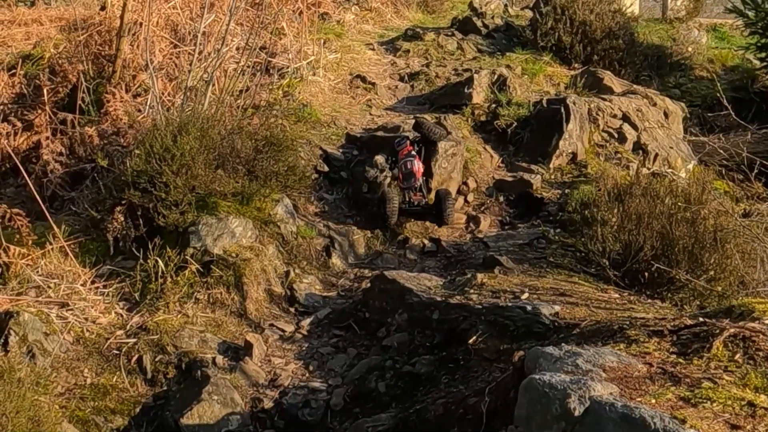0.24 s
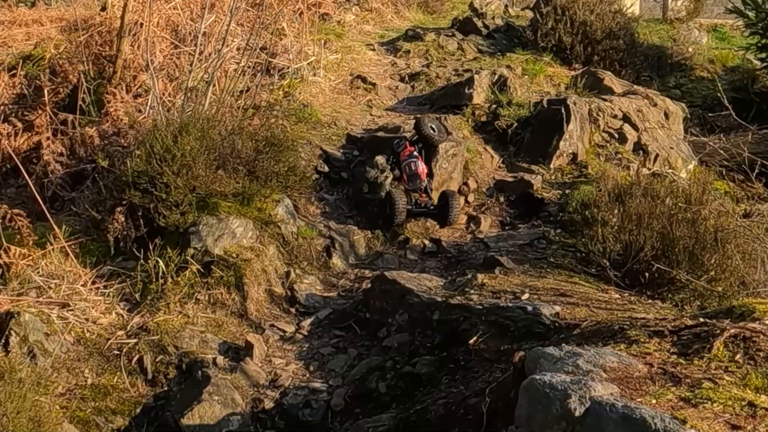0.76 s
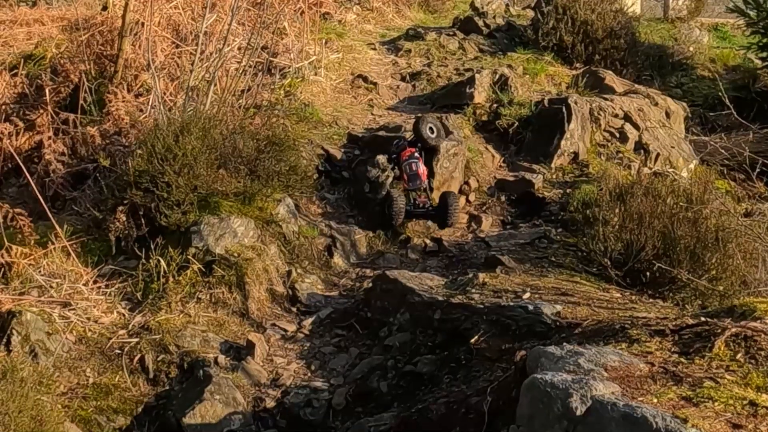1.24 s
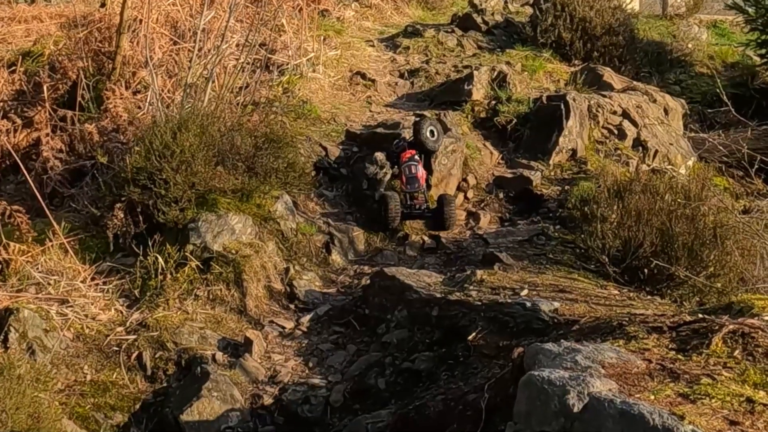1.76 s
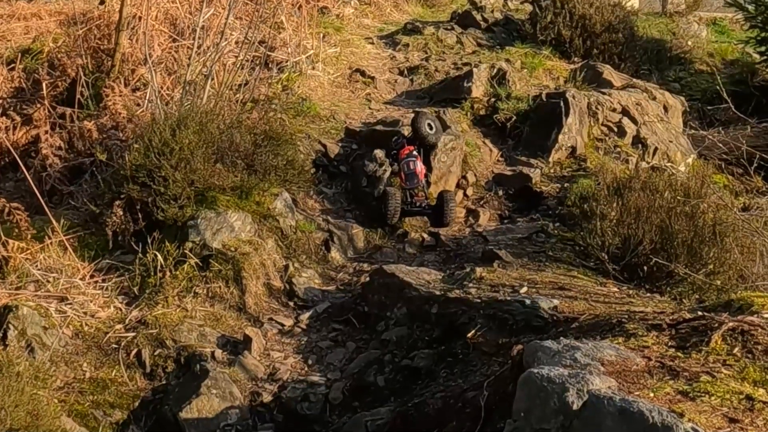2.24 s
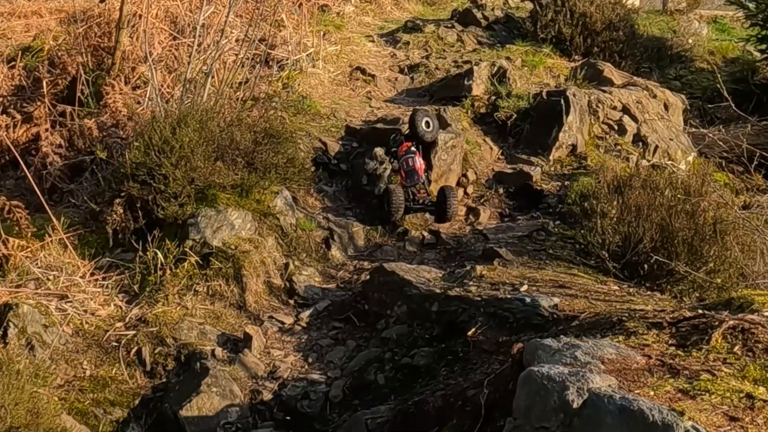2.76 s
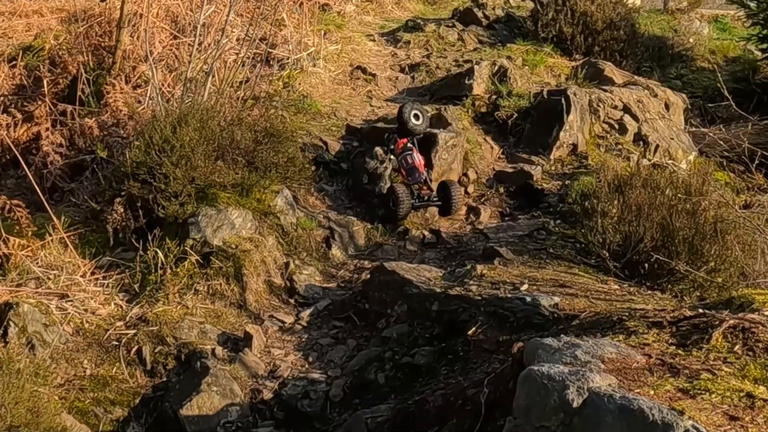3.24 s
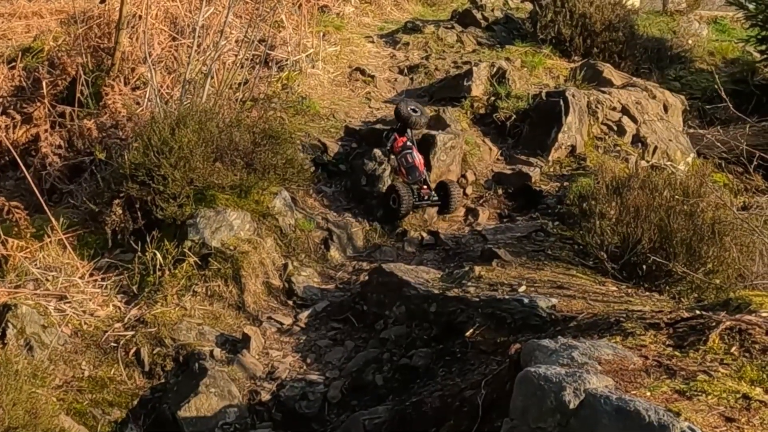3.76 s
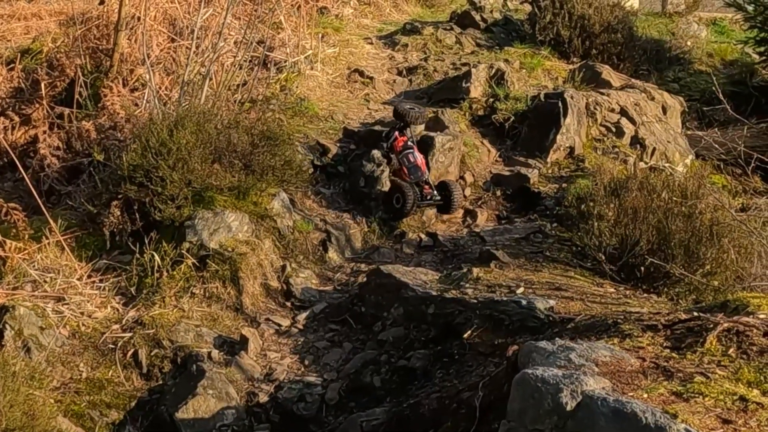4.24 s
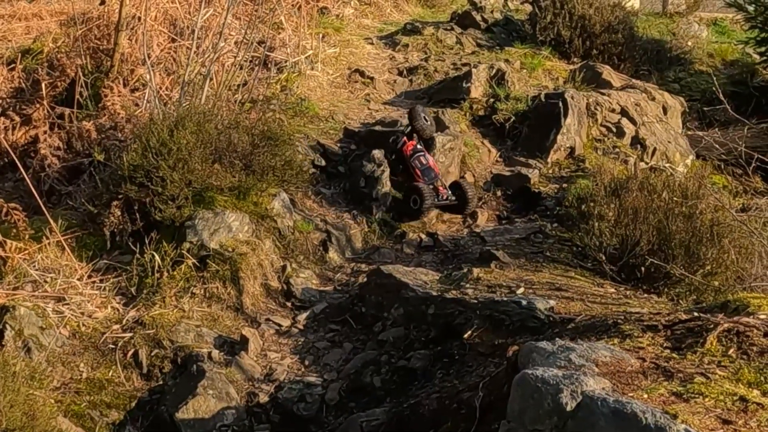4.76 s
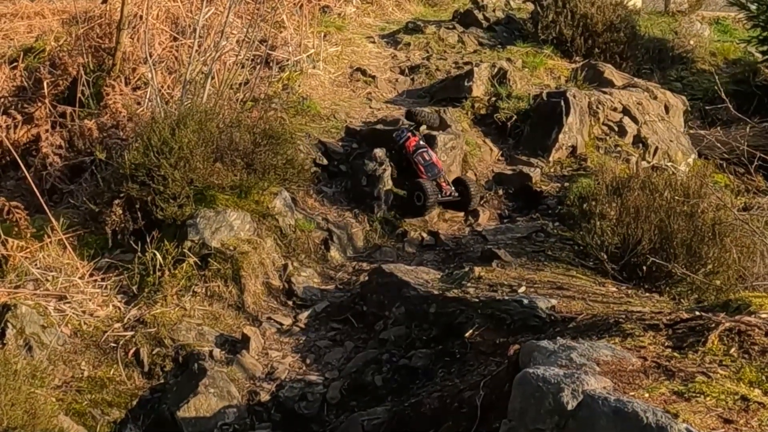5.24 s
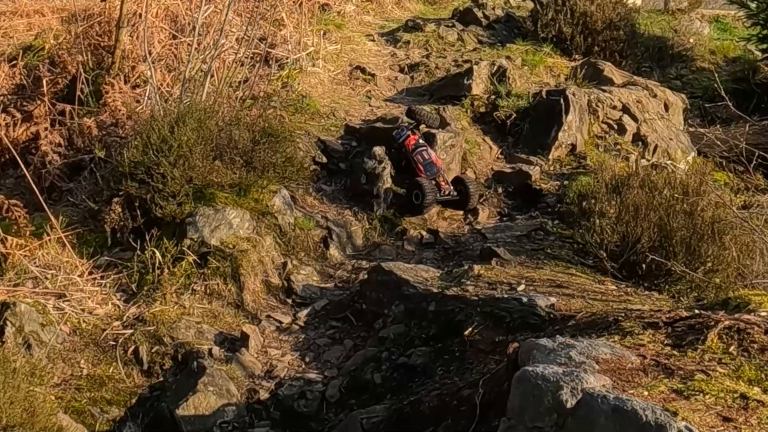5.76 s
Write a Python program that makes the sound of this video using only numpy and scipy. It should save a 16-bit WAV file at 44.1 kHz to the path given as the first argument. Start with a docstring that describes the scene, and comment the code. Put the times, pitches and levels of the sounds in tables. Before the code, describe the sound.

Quiet open hillside, with a soft steady rush and low wind bumps on a stereo microphone some metres from a small electric crawler. A gritty blip opens, a stone click comes at 0.16 s, a short motor whirr at 0.3, then bright servo zips from 0.55 to 0.9. Thin bird notes sound around 1 s. The motor whines and growls at 1.1-1.3, lower at 1.5-1.6, with more bird whistles to 1.85, then higher near 2.0. Servo zips overlap it and return at 2.3-2.5. The bird sings again from 2.5 to 3.1 while the motor grinds slowly, with knocks near 2.9-3.3. Two zips follow at 3.6-4.05, with wind thumps. A hard crack and knock lands at 4.26, another at 4.75. From 4.5 servo and drive work together; after 5.2 the growling whine swells, rises, sags around 5.7, and revs again at the end.

```python
"""A radio-controlled crawler's drive motor whines in short bursts over a growling gear train, with brief gritty rasps.
The crawler inches up a rocky gully, some metres from a camera outdoors; swept harmonics and tooth noise
ring through its casings. The steering servo zips; noise bursts and resonances make tyres and chassis knock on stone.
A small bird sings thinly in the trees as gliding sines, and light wind, shaped noise, buffets the microphone."""
import sys
import numpy as np
from scipy import signal
from scipy.fft import rfft, irfft, next_fast_len
from scipy.io import wavfile
from scipy.ndimage import uniform_filter1d, map_coordinates

SR = 44100
rng = np.random.default_rng(int(sys.argv[2]) if len(sys.argv) > 2 else 0)


def transcribe(signal):
    """Save signal, clipped to [-1, 1], as a 16-bit WAV file at the path in sys.argv[1]."""
    frames = np.atleast_2d(signal).T
    limited = np.clip(frames, -1, 1)
    pcm = np.round(limited * 32767).astype(np.int16)
    wavfile.write(sys.argv[1], SR, pcm)


N = 264732
T = np.arange(N) / SR  # time in seconds


def amp(db):
    """Decibel definition: twenty decibels are a factor of ten in amplitude."""
    return 10 ** (np.asarray(db) / 20)


def unit(x):
    """Normalisation of signal power: x scaled to rms 1."""
    return x / np.sqrt(np.mean(x ** 2) + 1e-20)


def steady(x):
    """Envelope levelling: x divided by its running rms over about 30 ms."""
    return x / np.sqrt(np.abs(uniform_filter1d(x ** 2, size=1300)) + 1e-9)


def along(points, hz):
    """Logarithmic frequency scale: (Hz, value) points interpolated on a log axis."""
    point_hz, value = np.transpose(points)
    return np.interp(np.log(hz + 1), np.log(point_hz + 1), value)


def wobble(rate):
    """Band-limited random modulation: a smooth curve through random knots, rate knots a second."""
    knots = rng.standard_normal(int(N * rate / SR) + 4)
    return map_coordinates(knots, [T * rate])


def filtered(x, response):
    """Linear filtering: the spectrum of x times a complex response of frequency in Hz."""
    m = next_fast_len(N + SR // 2)
    hz = np.fft.rfftfreq(m, 1 / SR)
    return irfft(rfft(x, m) * response(hz), m)[..., :N]


def coloured(x, spectrum):
    """Spectral shaping: x filtered by the given (Hz, dB) response, at rms 1."""
    return unit(filtered(x, lambda hz: amp(along(spectrum, hz))))


def rattle(rate, spread_db):
    """Random impulse process: irregular impacts of uneven strength, on average rate a second."""
    hits = rng.random(N) < rate / SR
    strength = rng.standard_normal(N) * amp(spread_db * rng.standard_normal(N))
    return unit(hits * strength)


def whine(pitch, orders, body, blur, flutter_db):
    """Source-filter principle: multiples of a shaft pitch sweep through fixed body resonances.

    Each line flutters separately in level (dB) and in phase (blur in radians)."""
    phase = 2 * np.pi * np.cumsum(pitch) / SR
    lines = 0
    for k, db in orders:
        level = amp(db + along(body, k * pitch) + flutter_db * wobble(45))
        lines = lines + level * np.sin(round(k) * phase + blur * wobble(260))
    return steady(lines)


def panned(x, pan_db):
    """Interchannel level difference: pan_db is left against right, in dB."""
    return x * amp([[pan_db / 2], [-pan_db / 2]])


def outdoors(x, t60, wet_db, pan_db):
    """Diffuse scattering: rocks and bushes return a noise tail that falls 60 dB in t60 seconds.

    The two close ports hear it alike in the bass."""
    t = np.arange(SR // 2) / SR
    tail = rng.standard_normal((2, len(t))) * amp(-60 * t / t60) * (t > .003)
    tail = tail / np.linalg.norm(tail[0])
    mid, side = signal.fftconvolve(x[None], tail, axes=1)[:, :N]
    side = filtered(side, lambda hz: hz / np.hypot(hz, 1200))
    return panned(x + amp(wet_db) * np.array([mid + side, mid - side]), pan_db)


def ambience(spectrum, width, pan_db):
    """Interchannel coherence: stereo noise, mostly shared by the two ports."""
    mid, side = coloured(rng.standard_normal((2, N)), spectrum)
    return panned(np.array([mid + width * side, mid - width * side]), pan_db)


# Strength of the breeze over time. Each row: time in seconds, relative level in dB.
BREEZE = [(0.0, -52), (0.13, -58), (0.68, -58), (1.03, -62.5), (1.54, -67.5), (2.0, -53), (3.16, -53),
          (3.42, -55.5), (3.81, -46.5), (4.29, -62.5), (5.01, -43.5), (6.0, -43)]
# Gusts on the microphone. Each row: strongest moment in seconds, half length in seconds, relative level in dB.
GUST_EVENTS = [(0.02, 0.061, -35.5), (0.443, 0.025, -38), (0.556, 0.049, -39.5), (0.806, .05, -40),
               (2.447, 0.035, -43.5), (3.73, 0.039, -33), (3.87, 0.057, -30.5), (4.989, 0.047, -35.5),
               (5.489, 0.03, -36.5), (5.72, 0.11, -37)]
# Spectrum of the slow pressure swings. Each row: frequency in Hz, relative level in dB.
BUFFET_SPECTRUM = [(12, -5.5), (22, 6), (40, 3.5), (60, -5), (90, -30), (160, -38), (400, -91)]
# Spectrum of the small eddies in the strongest gusts. Each row: frequency in Hz, relative level in dB.
EDDY_SPECTRUM = [(25, -29), (55, 2), (85, -2), (130, -11), (220, -20), (600, -70)]
# Spectrum of the steady rush of the hillside. Each row: frequency in Hz, relative level in dB.
RUSH_SPECTRUM = [(59, -39), (100, -9.5), (178, 3), (368, -4), (841, -8), (1030, -2.5), (1380, -2.5),
                 (2090, -10.5), (3650, -25), (4980, -24), (9070, -39), (12100, -40), (14000, -56)]
RUSH_DB = -59
BREEZE_DB, LULL_DB = 5, 3  # the breeze's buffet against its table, and the scale of its wandering


def wind():
    """Turbulent pressure fluctuation: gusts thump on the microphone over a steady rush."""
    breeze_db = np.interp(T, *np.transpose(BREEZE))
    breeze = amp(breeze_db + BREEZE_DB + LULL_DB * wobble(9))
    gusts = sum(amp(db) * np.exp(-((T - s) / half_s) ** 2) for s, half_s, db in GUST_EVENTS)
    strength_db = 20 * np.log10(np.hypot(gusts, breeze))
    buffet = amp(strength_db - 3.5) * ambience(BUFFET_SPECTRUM, width=.4, pan_db=-3.5)
    # eddies grow faster than the gust that sheds them
    eddies = amp(1.473 * strength_db + 8.0) * ambience(EDDY_SPECTRUM, width=0.35, pan_db=-4.5)
    rush = amp(RUSH_DB + 0.87 * wobble(4.43)) * ambience(RUSH_SPECTRUM, width=0.56, pan_db=-0.3)
    return buffet + eddies + rush


# Bird notes. Each row: start in seconds, length in seconds, start pitch in Hz, end pitch in Hz, level in dB.
BIRD_NOTES = [(0.922, 0.054, 5100, 4950, -63), (0.97, 0.043, 5600, 5500, -61.5),
              (1.027, 0.063, 4770, 4680, -58), (1.55, 0.026, 6204, 6850, -60),
              (1.59, 0.084, 7200, 6620, -62), (1.66, .035, 5400, 4060, -56), (1.7, 0.096, 6360, 7100, -63),
              (1.793, 0.075, 7400, 6850, -60), (2.488, 0.1, 5570, 5360, -58),
              (2.515, 0.0816, 5040, 4740, -55.5), (2.599, 0.12, 5130, 4630, -57.5),
              (2.723, 0.066, 4750, 4650, -64.5), (2.809, 0.068, 5920, 5630, -59.5),
              (2.922, .16, 5560, 4330, -55.5)]


def bird():
    """Frequency modulation: thin whistles quaver fast; each glides quickly, then settles on its last pitch."""
    song = np.zeros(N)
    quaver = 1 + .02 * wobble(450)
    for s, length, start_hz, end_hz, db in BIRD_NOTES:
        u = np.linspace(0, 1, round(length * SR))
        at = slice(round(s * SR), round(s * SR) + len(u))
        glide = end_hz + (start_hz - end_hz) * (1 - u) ** 3
        phase = 2 * np.pi * np.cumsum(glide * quaver[at]) / SR
        swell = np.sqrt(np.abs(np.sin(np.pi * u)))
        song[at] += amp(db) * swell * np.sin(phase)
    return song


# Contacts with stone. Each row: time in seconds, relative click level in dB, knock level against the click in dB.
STONE_CONTACTS = [(0.163, -39, -11.5), (1.05, -60, -9), (2.3956, -48, -18), (2.765, -55, -9),
                  (2.8922, -56, 1), (3.0742, -43.5, 4.5), (3.264, -51.5, 9), (4.2639, -33, 3.5),
                  (4.7514, -37.5, 1), (5.1407, -45.5, -23)]
# Resonances of the chassis. Each row: centre in Hz, bandwidth in Hz, relative level in dB.
CHASSIS_MODES = [(330, 55, 7), (594, 800, -7), (940, 94, -2.5), (1390, 71, -2.5), (2300, 290, -12.5)]
# Spectrum of the stony click. Each row: frequency in Hz, relative level in dB.
CLICK_SPECTRUM = [(1000, -4), (2300, 8.5), (3800, 8), (5000, -1), (6500, -9), (9000, -14), (14000, -15)]
# Spectrum of the bright crack. Each row: frequency in Hz, relative level in dB.
CRACK_SPECTRUM = [(800, -26), (2000, 1), (4500, -15), (6500, 5), (9000, -17), (12000, -1), (14000, -24)]


def chassis_response(hz):
    """Modal superposition: damped resonances of alternating sign add up."""
    total = 0
    for k, (centre, width, db) in enumerate(CHASSIS_MODES):
        damping = 1j * hz * width
        total = total + (-1) ** k * amp(db) * damping / (centre * centre - hz * hz + damping)
    return total


def knocks():
    """Impact excitation: each contact is a stony click and a dead chassis knock; hard ones crack brightly."""
    clicks, cracks, blows = np.zeros((3, N))
    t = np.arange(SR // 20) / SR
    # a fast and a slower decay, timed by their fall of 60 dB
    click_fade = amp(-60 * t / 0.0076) + amp(-9.5 - 60 * t / 0.028)
    crack_fade = amp(-60 * t / 0.011)
    hardest_db = max(db for _, db, _ in STONE_CONTACTS)
    for s, db, knock_db in STONE_CONTACTS:
        at = round(s * SR)
        crack_db = db + 4.1 * (db - hardest_db) - 1.5
        clicks[at:][:len(t)] += amp(db - 3.5) * click_fade * rng.standard_normal(len(t))
        cracks[at:][:len(t)] += amp(crack_db) * crack_fade * rng.standard_normal(len(t))
        blows[at] = amp(db + knock_db + 35.5)
    clicks = filtered(clicks, lambda hz: amp(along(CLICK_SPECTRUM, hz)))
    cracks = filtered(cracks, lambda hz: amp(along(CRACK_SPECTRUM, hz)))
    return clicks + cracks + filtered(blows, chassis_response)


# Steering moves. Each row: start in seconds, length in seconds, time to top speed in seconds,
# nominal top pitch in Hz, relative level in dB, top octave's level at full speed in dB, base roughness from 0 to 1.
STEERING_MOVES = [(0.545, 0.099, 0.068, 2103, -50.5, -6.5, .6),
                  (0.639, 0.23, 0.047, 2020, -42.5, -15.5, 0.03), (.785, .14, .045, 1200, -48, -17, .15),
                  (1.951, .15, .11, 1149, -52, -11.5, .35), (2.036, .16, .08, 1329, -47, -11, .15),
                  (2.12, .132, 0.068, 1147, -50, -11, .12), (2.308, 0.13, .07, 2094, -47, -5.5, .55),
                  (2.409, .12, 0.062, 1812, -58, -14, 0.67), (3.589, 0.22, 0.087, 1863, -45, -4.5, 0.1),
                  (3.817, .265, 0.14, 1411, -48, -9, 0.05), (4.553, 0.19, .047, 2001, -47, -5, 0),
                  (4.682, .13, .055, 1432, -50.5, -9, 0.48), (4.758, .14, 0.048, 1391, -50, -11, 0.47),
                  (4.913, 0.075, .04, 1700, -55.5, -2.5, 0.87),
                  (4.981, 0.081, 0.046, 1879, -55.5, -5.5, 0.75), (5.121, 0.13, 0.063, 1600, -58.5, -4, .9),
                  (5.219, 0.11, .05, 1880, -50.5, -7, 0.07)]
SPIN_UP_S, ATTACK_S = .024, .014  # time scales of gaining speed, and of taking up slack before full loudness
SWING_S, BRAKE_S = .15, .016  # speed eases off either side of its top, and brakes at the goal
SETTLE_S, START_ROUGH = 0.027, 0.64  # it chatters as it starts
LABOUR_ROUGH = 0.603  # and again as the load slows it
SWELL_POWER, BRIGHT_DB_PER_OCTAVE = .85, 11  # shape of a move's swell; treble gained with speed


def steering():
    """Motor dynamics under load: each move spins up, swells, sags and brakes.

    Gives pitch in Hz, level, top-octave level in dB and roughness; the louder of two moves rules."""
    controls = np.array([[900.], [0], [-20], [1]]) * np.ones(N)
    for s, length, to_top_s, top_hz, db, top_db, rough in STEERING_MOVES:
        at = np.flatnonzero((T > s) & (T < s + length))
        age = T[at] - s
        brake = 1 - .5 * np.exp((age - length) / BRAKE_S)
        speed = brake / np.cosh((age - to_top_s) / SWING_S)
        spin_up = 1 - .5 * np.exp(-(age / SPIN_UP_S) ** 2)
        swell = np.abs(np.sin(np.pi * age / length)) ** SWELL_POWER
        level = amp(db) * swell * (1 - np.exp(-age / ATTACK_S))
        bright_db = top_db + BRIGHT_DB_PER_OCTAVE * np.log2(speed)
        chatter = rough + START_ROUGH * np.exp(-(age / SETTLE_S) ** 2) + LABOUR_ROUGH * (1 - speed)
        move = [top_hz * speed * spin_up, level, bright_db, np.clip(chatter, 0, 1)]
        controls[:, at] = np.where(level > controls[1, at], move, controls[:, at])
    return controls


# Resonances of the servo's case. Each row: frequency in Hz, relative level in dB.
SERVO_RESONANCES = [(1500, -33), (2600, -10.5), (3300, -9), (3900, -8), (4500, -7.5), (5500, 1.5),
                    (6700, 0.5), (7700, 1), (8750, -11.5), (9800, -7), (11000, 0.5), (12100, -10.5),
                    (13200, -10), (14300, -31)]
STUMBLE = .045  # scale of the pitch wavering as the tyres catch, at full roughness
SERVO_LOW_HZ = 4300  # the tiny servo radiates its lines poorly below this


def servo():
    """Gear-mesh harmonics: a tiny fast motor and metal gears give swept clean lines, a hiss when it hunts."""
    pitch, level, top_db, rough = steering()
    pitch = pitch * (1 + 0.002945 * wobble(120) + STUMBLE * rough * wobble(50))
    # the gear mesh stresses the second multiple by 4 dB
    orders = [(k, 4 * (k == 2)) for k in np.arange(2, 11)]
    tone = whine(pitch, orders, SERVO_RESONANCES, blur=.4, flutter_db=3.5)
    tone = steady(filtered(tone, lambda hz: hz ** 3 / (hz ** 3 + SERVO_LOW_HZ ** 3)))
    teeth = rattle(3 * pitch, spread_db=1)
    hiss = coloured(1.4 * teeth + rng.standard_normal(N), SERVO_RESONANCES)
    sound = np.sqrt(1 - rough) * tone + np.sqrt(rough) * hiss
    # the case beams its top octave, so brightness changes from move to move
    top = filtered(sound, lambda hz: 1 / (1 + (8800 / (hz + 1)) ** 20))
    share = np.clip(amp(top_db) ** 2, 0, .9)
    lower_part = amp(0.2) * np.sqrt(1 - share) * steady(sound - top)
    top_part = amp(2.5) * np.sqrt(share) * steady(top)
    # the position loop corrects in small jerks
    jerks = amp(2.99 * rough * wobble(60))
    return jerks * level * (lower_part + top_part)


# Short gritty rasps of the drive motor. Each row: start in seconds, length in seconds, level in dB.
MOTOR_RASPS = [(0, 0.043, -47.5), (0.975, 0.033, -62.5), (1.264, 0.052, -50), (1.444, 0.11, -53),
               (2.139, 0.035, -49.5), (2.37, 0.029, -50), (4.937, 0.038, -54.5), (5.018, .03, -59)]
# Spectrum of the rasp. Each row: frequency in Hz, relative level in dB.
RASP_SPECTRUM = [(700, -23), (1500, 7), (2800, -2), (4200, 5.5), (5400, -6), (8500, -22), (14000, -30)]


def motor_rasps():
    """Random impact excitation: the motor blips briefly, a shower of tiny impacts."""
    stroke = 0
    for s, length, db in MOTOR_RASPS:
        u = np.clip((T - s) / length, 0, 1)
        stroke = stroke + amp(db) * np.sqrt(np.abs(np.sin(np.pi * u)))
    impacts = rattle(5000, spread_db=1)
    return stroke * coloured(impacts, RASP_SPECTRUM)


def arch(s, rise_s, fall_s):
    """Inertial rise and decay: share of top speed for a motor that peaks at s seconds."""
    return 1 / np.cosh(np.clip((T - s) / np.where(T < s, rise_s, fall_s), -20, 20))


# Throttle blips; close ones run together into one burst. Each row: fastest moment in seconds, spin-up in seconds,
# run-down in seconds, top pitch in Hz, relative whine level in dB, relative gear growl level in dB.
THROTTLE_BLIPS = [(.03, 0.039, .05, 770, -55, -57.5), (0.276, 0.043, 0.041, 689, -54.5, -59.5),
                  (.33, 0.044, 0.033, 712, -52.5, -45), (1.16, 0.065, 0.064, 700.5, -48.5, -46.5),
                  (1.219, 0.061, 0.032, 832, -46, -38), (1.3, 0.023, 0.062, 712, -58, -56),
                  (1.5, 0.078, 0.064, 566.6, -54.5, -50.5), (1.59, 0.067, 0.046, 519.6, -46.5, -43.5),
                  (1.92, 0.053, 0.056, 810, -46.5, -42), (1.97, .05, 0.039, 978, -43.5, -37.5),
                  (2.005, .04, .022, 780, -47, -40), (2.16, .03, .04, 840.6, -57.5, -64.5),
                  (2.77, 0.052, 0.057, 330, -64, -60.5), (2.891, 0.034, 0.026, 330, -62, -54),
                  (3.13, 0.077, 0.11, 403, -54.5, -53.5), (3.28, .1, 0.051, 400, -55.5, -52.5),
                  (4.28, .04, .05, 330, -58, -48.5), (4.56, .03, 0.0607, 510, -51.5, -43),
                  (4.67, 0.069, .07, 706, -49, -38.5), (4.805, .08, 0.061, 732.5, -51, -36),
                  (4.96, .025, 0.0401, 600.6, -57.5, -47), (5.015, .035, .025, 739, -56.5, -46),
                  (5.27, .06, 0.074, 940, -47.5, -33.5), (5.4, 0.069, 0.086, 1027, -47, -35.5),
                  (5.555, 0.089, .07, 926, -49.5, -36), (5.655, 0.093, 0.038, 760, -50.5, -36.5),
                  (5.965, .05, 0.081, 831.5, -48.5, -34.5)]
WHINE_POWER, GROWL_POWER = 1.09, 1.745  # amplitude grows as these powers of the motor's speed
GROWL_LAG_S = 0.0073  # the gears load up just after the motor


def throttle():
    """Speed-dependent excitation: pitch in Hz, whine level and growl level each follow their strongest blip."""
    blips = []
    for s, rise_s, fall_s, top_hz, whine_db, growl_db in THROTTLE_BLIPS:
        speed = arch(s, rise_s, fall_s)
        gear_load = arch(s + GROWL_LAG_S, rise_s, fall_s)
        blips.append((top_hz * speed,
                      amp(whine_db) * speed ** WHINE_POWER,
                      amp(growl_db) * gear_load ** GROWL_POWER))
    return np.max(blips, axis=0)


# Spectrum of the gearbox's growl. Each row: frequency in Hz, relative level in dB.
GEARBOX_SPECTRUM = [(59, -70), (100, -12), (199, -5), (237, -1.5), (292, -8), (367, 5.5), (545, -16),
                    (657, -12.5), (800, -19.5), (1020, -27), (1200, -40), (1560, -83), (2640, -120)]
# Resonances of the motor can. Each row: frequency in Hz, relative level in dB.
CAN_RESONANCES = [(470, -6), (800, -4), (1020, 2), (1190, -6.5), (1340, 5), (1600, 2.5), (1870, -5.5),
                  (2320, -3), (3570, -10), (4880, -6.5), (6280, -11.5), (9100, -25), (10800, -21.5),
                  (14000, -39)]
# Lines of the motor's whine. Each row: multiple of the pitch, relative level in dB.
WHINE_LINES = [(1, -1), (2, 1), (3, 1), (4, -1), (5, 2), (6, 5)]
SLOWEST_HZ = 330  # the motor's pitch at a crawl
TOOTH_NOISE_HZ = 3970  # above this the motor's lines sink into tooth noise


def drive():
    """Harmonic and impact excitation: the motor sings in its can, loaded gears chatter faster with speed."""
    pitch, whine_level, growl_level = throttle()
    pitch = np.maximum(pitch, SLOWEST_HZ)
    tone = whine(pitch * (1 + .012 * wobble(70)), WHINE_LINES, CAN_RESONANCES, blur=.5, flutter_db=4.5)
    tone = steady(filtered(tone, lambda hz: 1 / np.sqrt(1 + (hz / TOOTH_NOISE_HZ) ** 6)))
    # at a crawl the motor only grinds; the whine emerges with speed
    singing = np.clip((pitch - 380) / 220, 0, 1)
    # brush and tooth noise swells once a turn of the armature
    turn = np.cos(2 * np.pi * np.cumsum(pitch / 6) / SR)
    brushes = rattle(6 * pitch, spread_db=1.5)
    grinding = coloured((0.81 * brushes + rng.standard_normal(N)) * (1 + 0.28 * turn), CAN_RESONANCES)
    # the gears take up and lose their backlash in uneven lumps
    lumps = unit(amp(2.4 * wobble(55)))
    teeth = rattle(1.5 * pitch, spread_db=2) * (1 + .5 * turn)
    growl = lumps * steady(coloured(teeth, GEARBOX_SPECTRUM))
    motor = amp(0.36) * singing * tone + amp(-3.0) * grinding
    return whine_level * motor + amp(1.34) * growl_level * growl


def scene():
    """Superposition of sources: the wind, the bird farther off, and the crawler among the rocks."""
    song = outdoors(bird(), t60=.5, wet_db=-2.5, pan_db=-.8)
    knocks_and_rasps = outdoors(knocks() + motor_rasps(), t60=0.37, wet_db=-8.5, pan_db=0.0)
    steering_servo = outdoors(servo(), t60=0.28, wet_db=-10.5, pan_db=0.5)
    drive_train = outdoors(drive(), t60=0.087, wet_db=-10.5, pan_db=-0.8)
    return wind() + song + knocks_and_rasps + steering_servo + drive_train


TOP_HZ = 14100  # the camera's band limit


def record(dry):
    """Band limitation: a steep low-pass leaves almost nothing above the camera's limit."""
    return filtered(dry, lambda hz: 1 / np.sqrt(1 + (hz / TOP_HZ) ** 90))


dry = scene()
out = record(dry)
transcribe(out)
```